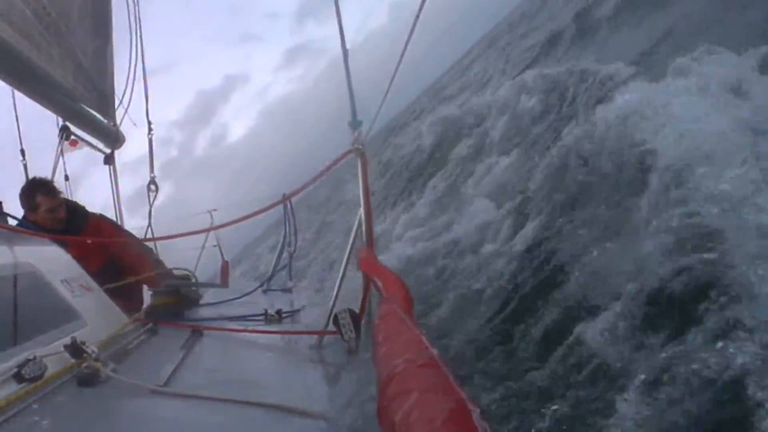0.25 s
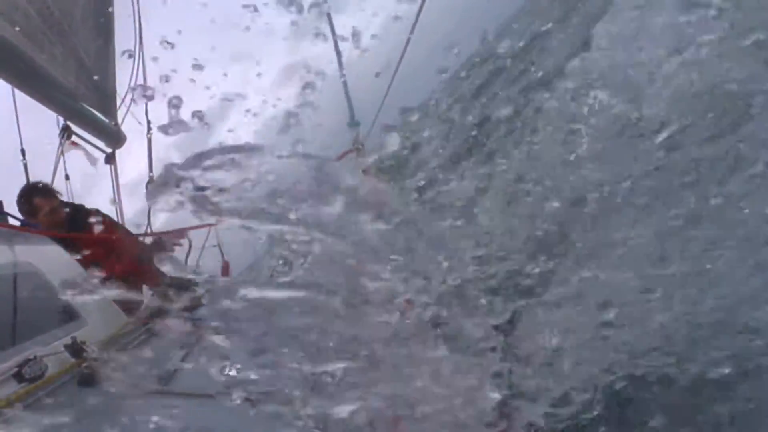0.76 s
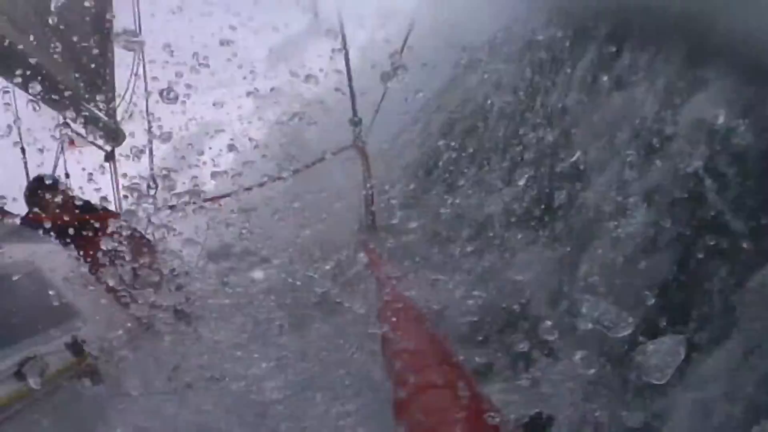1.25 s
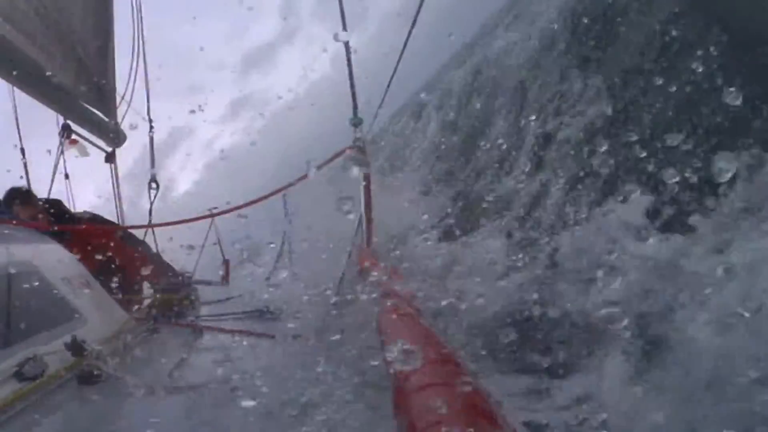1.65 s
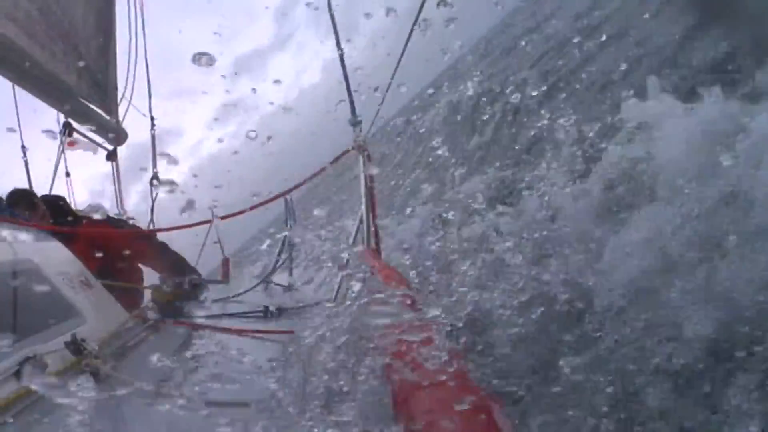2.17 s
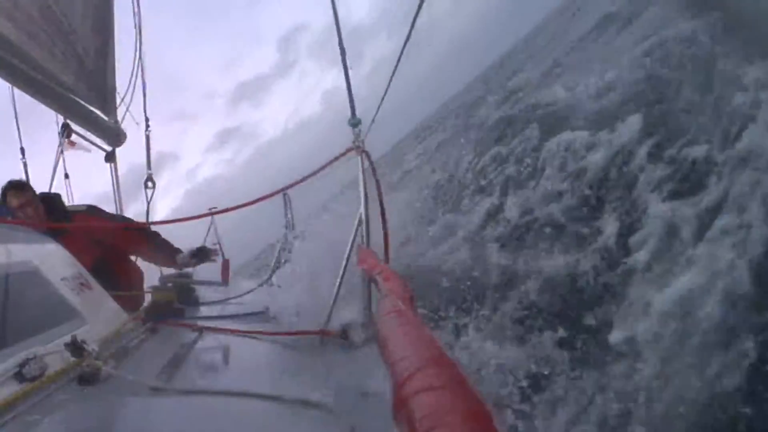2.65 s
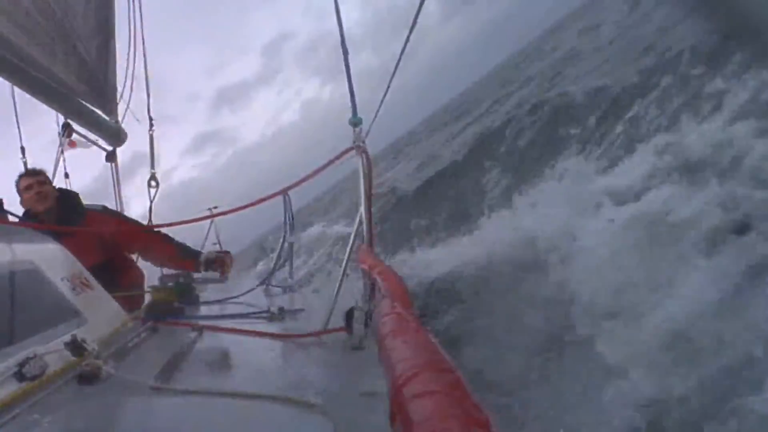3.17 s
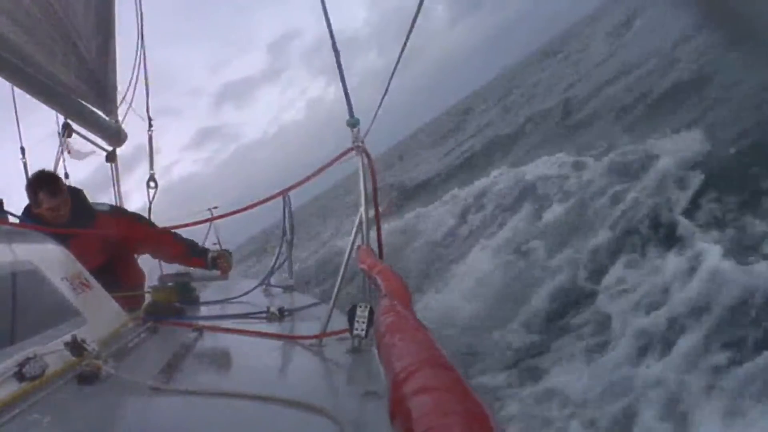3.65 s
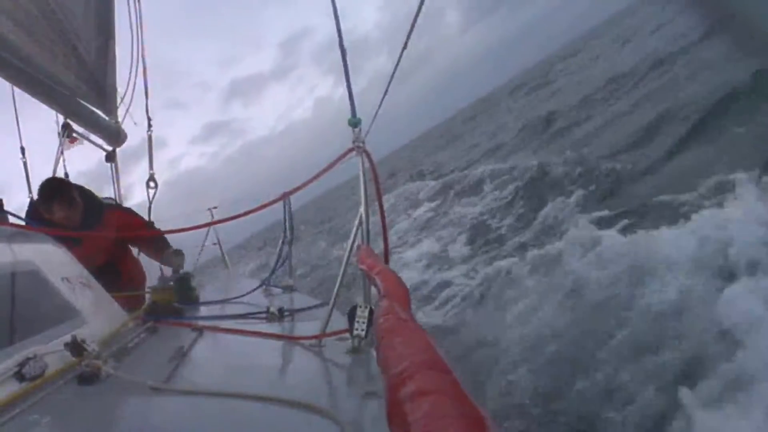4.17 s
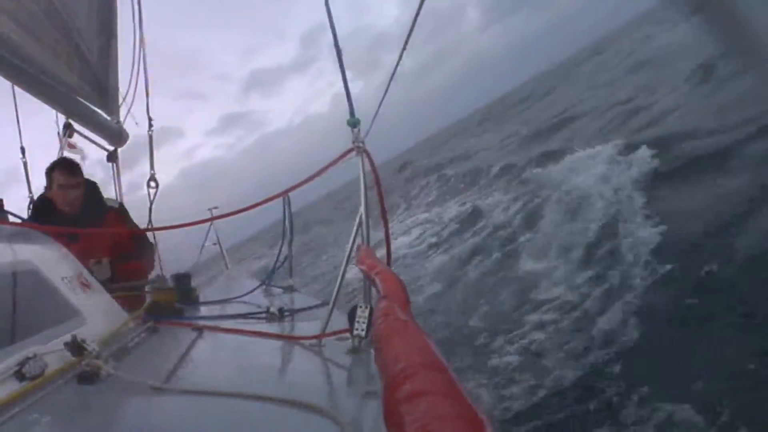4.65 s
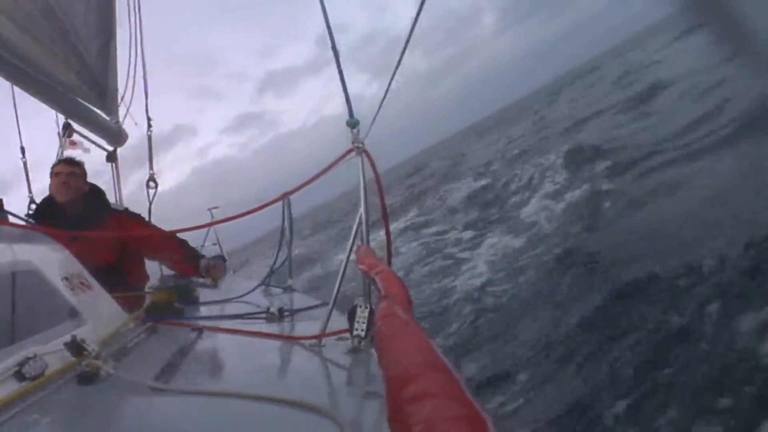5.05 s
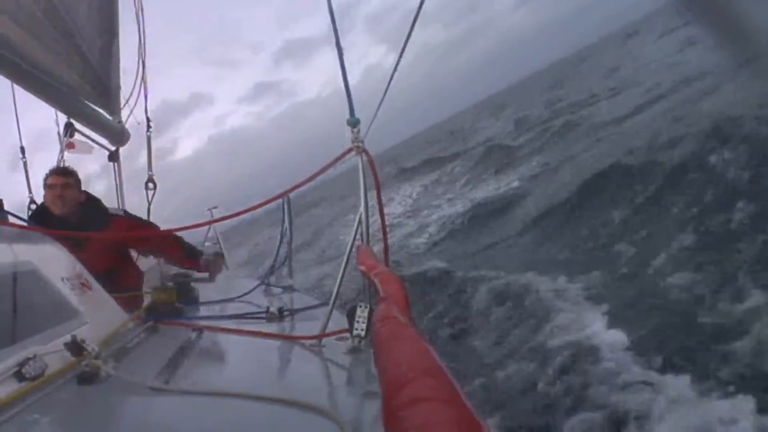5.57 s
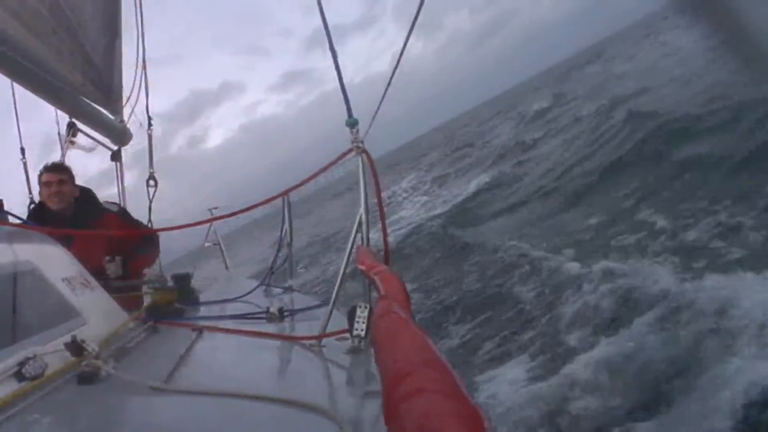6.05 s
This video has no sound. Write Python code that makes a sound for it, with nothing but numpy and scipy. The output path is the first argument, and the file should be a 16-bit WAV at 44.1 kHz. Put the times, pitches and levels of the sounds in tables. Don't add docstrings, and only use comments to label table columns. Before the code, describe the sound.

The microphone sits in a sealed plastic case on a yacht's rail, so everything is close, hollow and dull on top. At 0 s a wave is already breaking: dense rough scrubbing, rapid plasticky jolts and a loud groan falling in pitch, easing by 0.5 s. Low water thuds at 0.8-0.95 s lead into a surge around 1 s with a wavering groan; a sharp tap at 1.25 s, then steady wash and faint mist hiss to 1.7 s. A clap and tiny squeak mark 2 s. Another surge peaks near 2.4 s, a hard tap at 2.7 s, then brighter spray with higher groaning and hull hum until 3.2 s. From 3.5 s water drains away; clamp knocks grow louder until 4.2 s. Near quiet follows, with faint hiss and small ticks. At 5.4 s a massive booming, cracking slam overloads the microphone; soft knocks follow, then a lighter rattling slam at 6.24 s.

```python
import sys
import numpy as np
from scipy import signal
from scipy.fft import rfft, irfft, next_fast_len
from scipy.io import wavfile
from scipy.ndimage import uniform_filter1d, map_coordinates

SR = 44100
rng = np.random.default_rng(int(sys.argv[2]) if len(sys.argv) > 2 else 0)


def undo_db(level):
    steps = np.asarray(level, float) / 20
    return 10 ** steps


def int16_out(signal):
    q = np.round(np.clip(np.atleast_2d(signal).T, -1, 1) * 32767)
    wavfile.write(sys.argv[1], SR, q.astype(np.int16))


N = 278271


def unit(x):
    return x / np.sqrt(np.mean(x ** 2) + 1e-20)


def curves(rows):
    s, *cols = np.transpose(rows)
    return [np.interp(np.arange(N) / SR, s, c) for c in cols]


def wobble(rate_hz):
    knots = rng.standard_normal(int(N * rate_hz / SR) + 4)
    return map_coordinates(knots, [np.arange(N) * rate_hz / SR])


def filtered(x, response):
    m = next_fast_len(x.shape[-1] + SR // 4)
    spectrum = rfft(x, m) * response(np.fft.rfftfreq(m, 1 / SR))
    return irfft(spectrum, m)[..., :x.shape[-1]]


def ringing(x, modes):
    def response(f):
        return sum((-1) ** k * undo_db(db) * 1j * f * width / (hz * hz - f * f + 1j * f * width)
                   for k, (hz, width, db) in enumerate(modes))
    return filtered(x, response)


def coloured(spectrum):
    hz, db = np.transpose(spectrum)
    noise = rng.standard_normal(N)
    return unit(filtered(noise, lambda f: undo_db(np.interp(np.log(f + 1), np.log(hz + 1), db))))


def swells(rows, rest_db, rise_s, fall_s):
    s, db = np.transpose(rows)
    grid = np.arange(0, N, 64)
    late = grid[:, None] / SR - s
    swell = undo_db(2 * db) * np.exp(-np.maximum(-2 * late / rise_s, 2 * late / fall_s))
    power = undo_db(2 * rest_db) + swell.sum(axis=1)
    return np.interp(np.arange(N), grid, np.sqrt(power))


def damped(x):
    return filtered(x, lambda f: 1 / (1 + 1j * f / 2600) ** 2)


def evened(x):
    x = unit(x)
    return x / (np.abs(uniform_filter1d(x ** 2, size=300)) + 0.061) ** (0.3 / 2)


def displaced(wash, lumps):
    fine, solid = np.abs(uniform_filter1d(np.array([wash, lumps]) ** 2, size=200))
    return wash * np.sqrt(fine / (fine + 2 * solid + 1e-20))


# frequency in Hz, width in Hz, level in dB.
RAIL_MODES = [(185, 40, -4), (251.4, 49.5, -3), (313.8, 15.8, 0), (441.5, 34, -9.5)]
CLAMP_MODES = [(562, 70, 0), (632, 41, 5.5), (722, 31, 4.5), (797, 32, -2), (948, 53, 4.5), (957, 367, -10)]
CASE_MODES = [(1384.6, 40.4, 2.5), (1477.5, 66.4, 5.5), (1534, 42, 6.5), (1639, 104, -3.5)]
DOOR_MODES = [(1730, 120, -6), (1833, 88, 4.5), (2070, 85, -4), (1966, 74, -10.5)]
COVER_MODES = [(2410, 480, -1.5), (2980, 160, 5.5), (3177, 120, 4), (3490, 60, 4.5), (3924, 80, 8),
               (4520, 220, -8.5), (4800, 550, -33.5), (4840, 86, -6), (4700, 63, -19)]
# start in seconds, force in dB, spray height in dB, load on the clamp in dB.
WASH = [
    [(0, -24.5, -3, 0), (.04, -19, -16, -10), (.425, -21.5, -22, -4), (.46, -40, -28.5, 17.5),
     (.56, -43.5, -7.5, 15)],
    [(.66, -32.5, -14, 0), (.74, -30, -15.5, 1), (.88, -19, -17, -6), (.97, -19, -18, -6.5),
     (1.08, -20.5, -19.5, -5.5), (1.14, -32.5, -20.5, 8.5), (1.2, -24.5, -23, -3.5),
     (1.25, -36.5, -10.5, -1)],
    [(1.3, -27.5, -18, -4.5), (1.42, -21.5, -18, -8.5), (1.51, -20, -17, -16), (1.6, -21.5, -18.5, -13),
     (1.68, -27, -18, -2.5), (1.82, -37.5, -1.5, 7)],
    [(2.02, -30.5, -7, 3.5), (2.25, -22.5, -24, -6), (2.33, -20, -27, -10), (2.43, -20.5, -15.5, -7.5),
     (2.47, -29.5, 0.5, 2)],
    [(2.68, -30.5, 6, 2), (2.76, -22.5, 0.5, -4.5), (2.89, -25, -1.5, 0), (2.93, -34, 8.5, 3),
     (3.01, -21.5, -5.5, -4), (3.05, -34, 7, 8.5), (3.24, -35, -4.5, 0), (3.3, -36, -4.5, -2.5),
     (3.42, -38, -5, 14), (3.5, -47.5, 6, -14)],
]
# level in dB at full force, then dB per dB of force, of spray height, of load.
ANSWER = [
    (-33.5, 0.54, 0.0065, 0.068),
    (-20, 1.86, 0.015, 0.97),
    (-20.5, 1.34, 0.007, 0.0092),
    (-18.5, 1.71, 1.06, 0.01),
    (-31, 1.96, 0.38, 0.34),
]


def scrub():
    clumps = undo_db(1.0 * wobble(70) + 0.6 * wobble(18))
    impacts = rng.standard_normal(N) * undo_db(1.9 * rng.exponential(size=N))
    force_db, height_db, load_db = curves(sum(WASH, []))
    full_db, ebb_db_per_s = -20, 2.5
    ebb_s = np.maximum(np.arange(N) / SR - WASH[-1][-1][0], 0)
    force_db = force_db - ebb_db_per_s * ebb_s - full_db
    sound = 0
    parts = [RAIL_MODES, CLAMP_MODES, CASE_MODES, DOOR_MODES, COVER_MODES]
    for modes, (db, by_force, by_height, by_load) in zip(parts, ANSWER):
        own = undo_db(1.2 * wobble(29.626)) * (impacts + 0.76 * rng.standard_normal(N))
        if modes is COVER_MODES:
            patchy = undo_db(0.33 * wobble(21))
            ring = ringing(clumps * own * patchy, modes)
            felt_db = uniform_filter1d(force_db, size=SR // 10)
        else:
            ring = damped(evened(ringing(clumps * own, modes)))
            felt_db = force_db
        level_db = db + by_force * felt_db + by_height * height_db + by_load * load_db
        sound = sound + undo_db(level_db) * unit(ring)
    return sound


# time in seconds, slips per second in Hz, level in dB.
GROANS = [
    [(0.0, 282.4, -17), (0.04, 260.6, -28.5), (0.104, 258.8, -32.5), (.14, 264.9, -31), (0.174, 254.4, -28),
     (.215, 236.3, -29.5), (0.25, 192, -32.5), (0.32, 182.1, -23.5), (.36, 182.4, -30.5), (0.5, 174, -35)],
    [(0.8, 164.6, -35.5), (0.858, 184, -23.5), (0.93, 239, -52), (1.018, 247, -38), (1.074, 163.6, -24.5),
     (1.12, 150.7, -30.5)],
    [(1.38, 186.8, -38), (1.49, 221.8, -27.5), (1.544, 194, -51.5), (1.602, 176.4, -27),
     (1.66, 176.6, -28.5)],
    [(2.3, 165.9, -25.5), (2.358, 182.6, -39.5), (2.428, 202.4, -31), (2.5, 218, -67)],
    [(2.48, 316.4, -41), (2.56, 310, -39), (2.66, 315.4, -44), (2.7, 329.4, -32.5), (2.788, 369, -35.5),
     (2.936, 397, -37), (2.99, 363.6, -34.5), (3.12, 377.3, -37.5), (3.15, 378, -48.5)],
]
GROAN_DRIVE_DB = [-6, -0.5, -4, -4]
# frequency in Hz, width in Hz.
SINGING = [(750, 26), (940, 15)]


def groans():
    def overtone_gain(f):
        lift = sum(1 / (1 + ((f - mode_hz) / width_hz) ** 2) for mode_hz, width_hz in SINGING)
        return undo_db(-17 + 20.5 * lift)

    t, tugs, swing = np.arange(N) / SR, np.zeros(N), np.zeros(N)
    for rows in GROANS:
        hz, db = curves(rows)
        turns = np.cumsum(hz * (1 + 0.017 * wobble(60))) / SR
        start_s, end_s = rows[0][0], rows[-1][0]
        fade = np.clip(np.minimum(t - start_s + .015, end_s - t) / 0.025, 0, 1)
        slips = np.diff(np.floor(turns), prepend=0)
        tugs += slips * fade * undo_db(db + 32.5 + 1.4 * wobble(44))
        overtones = sum(overtone_gain(k * hz) * np.sin(k * 2 * np.pi * turns) for k in range(2, 6))
        swing += (np.sin(2 * np.pi * turns) + overtones) * fade * undo_db(db - 1.5 + 1.2 * wobble(25))
    pull = damped(tugs)
    parts = [RAIL_MODES, CLAMP_MODES, CASE_MODES, DOOR_MODES]
    return swing + sum(undo_db(db) * ringing(pull, modes) for db, modes in zip(GROAN_DRIVE_DB, parts))


# time in seconds, peak in dB, ring in Hz.
CASE_JOLTS = [(0.001, -15.5, 1530), (0.033, -13.5, 1460), (0.062, -9.5, 1564), (0.1386, -10.5, 1485),
              (0.1678, -13.5, 1480), (0.2514, -10.5, 1478), (0.3174, -13, 1520), (0.3892, -16, 1600),
              (0.4928, -25, 1515), (0.666, -29.6, 1480), (0.678, -25, 1474), (0.7356, -21.5, 1470),
              (0.8733, -15, 1432), (0.889, -13.5, 1500), (0.9728, -8, 1490), (0.9911, -12, 1480),
              (1.046, -16.5, 1520), (1.068, -16, 1450), (1.084, -16, 1440), (1.1814, -29, 1515),
              (1.2018, -25, 1490), (1.285, -17.5, 1454), (1.2967, -20.5, 1490), (1.4532, -14.5, 1565),
              (1.487, -13, 1490), (1.5347, -10, 1520), (1.594, -13.5, 1470), (1.6154, -13.5, 1467),
              (1.891, -28, 1420), (1.9077, -31, 1440), (1.9567, -25, 1460), (2.081, -20, 1430),
              (2.0988, -20, 1605), (2.1837, -17, 1510), (2.2435, -13.5, 1446), (2.3178, -11, 1505),
              (2.339, -12.5, 1440), (2.4254, -13.5, 1460), (2.525, -23, 1470), (2.597, -19.5, 1560),
              (2.7066, -23, 1534), (2.728, -18, 1570), (2.8067, -26.5, 1560), (2.8873, -16.5, 1430),
              (2.98, -17, 1540), (3.0058, -16.5, 1500), (3.129, -26, 1470), (3.1534, -31.5, 1460),
              (3.249, -27.5, 1450)]
CLAMP_JOLTS = [(0.0519, -18, 777), (0.0841, -17.5, 782), (0.1893, -19.5, 775), (0.3769, -25, 788),
               (0.4259, -29, 810), (0.6564, -34, 725), (0.9957, -20, 800), (1.1983, -27, 743),
               (1.2637, -37, 760), (1.9046, -44, 784), (2.0743, -26, 677), (2.1626, -24.5, 710),
               (2.2487, -26.5, 700), (2.4059, -27, 690), (2.4474, -24, 760), (2.5124, -27, 930),
               (2.645, -21.5, 943), (2.7917, -16.5, 734), (2.8702, -18, 738), (2.8903, -20.5, 742),
               (2.9885, -20, 717), (3.0155, -23.5, 724)]
DOOR_JOLTS = [(0.027, -28, 1890), (0.1715, -26.5, 1890), (0.4, -30, 1750), (0.865, -32.5, 1883),
              (0.9597, -28.5, 1914), (1.068, -34.5, 1930), (1.2538, -38, 1920), (1.3312, -28, 1860),
              (1.477, -23.5, 1850), (1.6415, -33, 1900), (1.659, -27.5, 1850), (1.848, -37, 1790),
              (1.99, -25.5, 1830), (2.2347, -24.5, 1850), (2.27, -26, 1840), (2.3008, -24.5, 1850),
              (2.3685, -29, 1790), (2.3907, -30, 1820), (2.477, -26, 1840), (2.5996, -20, 1830),
              (2.7599, -17, 1960), (2.7904, -16, 1810), (2.859, -16.5, 1900), (2.9879, -19, 1872),
              (3.0067, -18, 1866), (3.1234, -25, 1820), (3.2452, -41, 1860)]
LATE_JOLTS = [(3.8291, -29, 1480), (3.8792, -34, 1470), (3.9362, -36, 1450), (4.1712, -35, 1470),
              (4.2062, -28, 1480), (4.2172, -31, 1470), (4.6512, -32, 1450), (4.6522, -40, 1880),
              (4.6602, -30, 1480), (4.7582, -44, 1450), (4.7722, -43, 1480), (4.9242, -35, 1450),
              (5.9072, -37, 1480), (6.2445, -14, 1560), (6.2432, -20, 2050), (6.249, -25, 2200),
              (5.437, -30, 1450), (6.2535, -17, 1480)]
RAIL_JOLTS = [(0.59, -44, 227), (0.845, -24, 193), (0.914, -24.5, 229), (0.97, -24, 298),
              (1.083, -25.5, 233), (1.2018, -34, 252), (1.257, -30, 290), (1.293, -31.5, 205),
              (1.5943, -25, 180), (1.7235, -44, 234), (1.7883, -43.5, 284), (1.9094, -34, 258.5),
              (1.9395, -36.5, 235), (1.999, -35, 277), (2.118, -44, 225), (2.1611, -33.5, 269),
              (2.314, -27.5, 275), (2.3707, -24, 206), (2.4429, -27, 284), (2.684, -46.5, 265),
              (3.0651, -24.5, 226.5), (4.38, -41.5, 240), (4.6668, -44, 235), (4.841, -42, 207),
              (4.9481, -45.5, 240), (5.036, -45.5, 214), (5.111, -47, 203), (5.1763, -40, 225),
              (5.5832, -38, 248), (5.663, -42, 232), (5.9353, -29.5, 214)]
COVER_JOLTS = [(0.1309, -33, 2520), (0.263, -39, 2760), (0.866, -35, 3150), (0.9622, -33.5, 3060),
               (0.987, -35.5, 3154), (1.2532, -41, 2730), (1.2804, -43, 3060), (1.3221, -44.5, 2970),
               (1.4932, -44, 3230), (1.6338, -49.5, 3000), (1.8464, -51, 2983), (2.256, -41, 3146),
               (2.391, -35, 3200), (2.5164, -32, 3950), (2.9511, -43, 3054), (3.1887, -52, 3560),
               (3.23, -41, 3055), (3.3745, -54, 2900)]
SOFT_JOLTS = [(3.1185, -26.5, 600), (3.318, -33.5, 515), (3.3485, -38, 725), (4.3512, -43, 705),
              (4.7712, -48, 780), (4.9248, -43.5, 540), (5.1362, -42, 740), (5.2761, -47, 724),
              (5.6703, -40, 550), (5.9311, -59, 586), (6.0377, -58, 667), (6.2479, -21, 922)]
# rise in seconds, fall in seconds.
JOLT_S = [
    (0.0036, 0.0042),
    (0.0061, 0.011),
    (0.0014, 0.0074),
    (0.0013, 0.0042),
    (0.014, 0.015),
    (0.002, 0.0034),
    (0.0054, 0.0074),
]


def jolts():
    before = 1024
    sound, t = np.zeros(N + SR), np.arange(-before, 3072) / SR
    kinds = [CASE_JOLTS, CLAMP_JOLTS, DOOR_JOLTS, LATE_JOLTS, RAIL_JOLTS, COVER_JOLTS, SOFT_JOLTS]
    for rows, (rise_s, fall_s) in zip(kinds, JOLT_S):
        shape = np.exp(-(t / np.where(t < 0, rise_s, fall_s)) ** 2)
        for s, db, hz in rows:
            jitter = uniform_filter1d(rng.standard_normal(len(t)), size=90)
            drift = np.cumsum(jitter) * hz ** 2 / 7e7
            sound[round(s * SR):][:len(t)] += undo_db(db) * shape * np.cos(2 * np.pi * hz * t + drift)
    return sound[before:N + before]


# time in seconds, level in dB.
FLEX = [(.33, -53), (.51, -41), (.94, -37), (1.26, -29), (1.39, -33), (1.66, -35), (2.08, -32),
        (2.4, -40.5), (2.65, -40), (2.86, -24), (3.04, -22.5), (3.2, -29), (3.33, -30.5), (3.496, -32.5),
        (3.654, -38.5), (3.9, -33), (4.1, -35.5), (4.196, -33), (4.366, -37), (4.44, -41), (4.6, -48),
        (5.166, -38), (5.52, -33), (5.704, -34), (5.92, -40), (5.966, -34), (6.18, -46)]
# frequency in Hz, width in Hz, level in dB.
HULL_MODES = [(131.5, 11.9, 6.5), (100, 18, -30)]


def hull():
    hum = ringing(rng.standard_normal(N), HULL_MODES)
    hum = unit(ringing(hum, [(125, 1400, 0)]))
    return swells(FLEX, rest_db=-51, rise_s=0.053, fall_s=0.042) * hum


# time in seconds, level in dB.
HEAVE = [(.12, -49), (.49, -48), (.84, -45), (1.29, -28), (1.38, -30), (1.47, -35.5), (1.8, -40),
         (2.07, -28), (2.15, -36.5), (2.23, -37), (2.45, -38.5), (2.7, -38.5), (3.0, -46), (3.3, -41.5),
         (3.55, -40), (4.9, -64), (5.3, -61)]
# frequency in Hz, level in dB per Hz.
SWING = [(5, -26), (10, -12.5), (20, -13), (29, 2.5), (40, -13), (55, -15.5), (80, -47), (150, -120)]
HISS = [(35, -72.5), (60, -9.5), (206, -6.5), (371, -28.5), (400, -25.5), (521, -14), (618, -24.5),
        (733, -10.5), (838, -21.5), (1480, -10.5), (2470, -24.5), (3500, -37), (5580, -32), (7250, -68.5),
        (12300, -120)]
# time in seconds, level in dB.
FAR_CREST = [
    (4.35, -48),
]
# frequency in Hz, width in Hz, level in dB.
AIR_GAP = [(2870, 100, 1.5), (3990, 310, 2)]


def background():
    heave = swells(HEAVE, rest_db=-49, rise_s=0.041, fall_s=0.089) * coloured(SWING)
    gap = unit(ringing(rng.standard_normal(N), AIR_GAP))
    far = coloured(HISS) + undo_db(-12 + 2.0 * wobble(27)) * gap
    return heave + swells(FAR_CREST, rest_db=-52.5, rise_s=0.39, fall_s=0.29) * far


# time in seconds, peak in dB, weight passed on to hull, rail and clamp in dB.
TAPS = [
    (0.4928, -39, 20.5),
    (1.2516, -22.5, 8),
    (2.695, -19, 6),
    (3.9473, -30.5, 13),
    (4.4643, -49, 2),
    (4.6477, -46.5, 17),
    (4.9195, -41, 6.5),
    (5.6521, -39, 10),
    (5.6666, -32, 0),
]
SLIPS = [(0.724, -26, -5.5), (3.4815, -31, 4.5), (3.6309, -26.5, 2), (3.765, -30, 5.5), (3.817, -24.5, 2),
         (3.887, -22, -1), (3.985, -20.5, 1), (4.0729, -18, -1), (4.1852, -16, 1), (4.348, -48, 9),
         (4.755, -53.5, 8)]
THUDS = [(2.859, -23.5, -17), (2.95, -23, -5), (3.0357, -42.5, 17.5), (3.307, -38, 0.5),
         (3.3225, -41, -0.5), (3.385, -40, 6), (3.4093, -42, 10.5), (3.397, -41, 2.5), (3.426, -43.5, 5),
         (5.1326, -54, 14), (5.903, -41.5, 5), (5.9369, -48, 1), (6.0332, -49, 1.5)]
DROPS = [(1.847, -43, -1), (1.969, -49, -4), (1.985, -32, 0), (3.1453, -37, 3.5), (3.1861, -41, 10),
         (3.2184, -38.5, -5), (3.226, -38.5, -16), (3.244, -39, -21), (3.344, -43, 9), (4.49, -43, -20),
         (5.165, -51.5, 7), (5.287, -52, -3), (5.3707, -36.5, -6.5)]
# hull, rail, clamp, lens cover, case, door in dB against the peak.
REACH = [
    (-21.5, -21, -13, -36, -7, -3.5),
    (-13, -4, 1, -25.5, -3, -14),
    (0, -2.5, -1.5, -26, -0.5, -9.5),
    (-15.5, 2, -7, -1, -7, -6.5),
]
# frequency in Hz, t60 in seconds, level in dB.
STRUCK = [
    [(128.3, 0.16, 0)],
    [(192, 0.11, -3.5), (260, 0.055, 7.5), (295.6, 0.12, -1.5)],
    [(540, 0.017, -11), (420, 0.055, -9.5), (664, 0.13, -5.5), (725, 0.034, 10.5), (810, 0.0047, -7.5),
     (938, 0.079, -4)],
    [(2350, 0.021, -4), (2870, 0.01, 2.5), (3570, 0.0057, 3.5), (3950, 0.021, -3), (4330, 0.011, -2),
     (5140, 0.0037, 0)],
    [(1450, 0.039, 4.5), (1560, 0.022, 0.5)],
    [(1860, 0.03, -1.5), (2060, 0.017, -3)],
]


def knocks():
    kinds, t = [TAPS, SLIPS, THUDS, DROPS], np.arange(SR // 5) / SR
    rows = np.concatenate(kinds)
    reach_db = np.repeat(REACH, [len(kind) for kind in kinds], axis=0)
    peak_db = rows[:, 1:2] + rows[:, 2:] * [1, 1, 1, 0, 0, 0] + reach_db
    bounce = np.round(SR * (0.0021 + 0.0066 * rng.random(len(rows)))).astype(int)
    sound = np.zeros(N + SR)
    for part, modes in enumerate(STRUCK):
        is_hull, is_cover = part == 0, part == 3
        luck_db = 2.4 * rng.standard_normal((len(rows), len(modes)))
        contact_s = .0006 if is_cover else .0014
        onset = (1 - np.exp(-t / contact_s)) ** 2
        ring = 0
        for k, (hz, t60, db) in enumerate(modes):
            decay = undo_db(db + luck_db[:, k:k + 1] - 60 * t / t60)
            ring = ring + decay * np.sin(2 * np.pi * hz * t) * onset
        chatter = uniform_filter1d(rng.standard_normal(ring.shape), size=400 if is_hull else 160, axis=1)
        ring = ring * (1 + 3.1 * chatter)
        ring = ring if is_cover else damped(ring)
        ring = -ring / np.abs(ring).max(axis=1, keepdims=True) * undo_db(peak_db[:, part:part + 1] + 4.0)
        for s, late, wave in zip(rows[:, 0] - .0019, bounce, ring):
            start = round(s * SR)
            sound[start:][:len(t)] += wave
            sound[start + late:][:len(t)] += .15 * wave
    return sound[:N]


# time in seconds, level in dB.
SURGES = [
    (.77, -38.5),
    (.87, -37),
    (.94, -33.5),
]
# time in seconds, level in dB.
MIST = [
    (1.25, -72.5),
    (1.6, -61.5),
    (1.95, -63),
    (2.5, -66.5),
    (2.85, -66),
]
# frequency in Hz, width in Hz, level in dB.
SURGE_RING = [(76, 21, 0)]
MIST_RING = [(5246, 150, 0)]


def spray():
    mist = unit(ringing(rng.standard_normal(N), MIST_RING))
    mist = swells(MIST, rest_db=-99, rise_s=0.1, fall_s=0.16) * mist
    low = unit(ringing(ringing(rng.standard_normal(N), SURGE_RING), SURGE_RING))
    return undo_db(6.5) * mist + swells(SURGES, rest_db=-82.5, rise_s=0.013, fall_s=0.013) * low


# start in seconds, # length in seconds, from Hz, to Hz, level in dB.
CHIRPS = [
    (3.945, .03, 1950, 2500, -43),
    (3.943, .016, 3850, 3950, -48),
    (3.957, .014, 4300, 4550, -52),
    (5.46, .02, 3950, 3980, -50),
    (5.492, .018, 3950, 3900, -52),
    (1.9825, .009, 4150, 3700, -26),
    (1.994, .007, 4000, 3900, -36),
]


def squeaks():
    sound = np.zeros(N)
    for s, length_s, from_hz, to_hz, db in CHIRPS:
        u = np.arange(round(length_s * SR)) / (length_s * SR)
        turns = np.cumsum(from_hz + (to_hz - from_hz) * u ** 2) / SR
        sound[round(s * SR):][:len(u)] += undo_db(db) * np.sin(np.pi * u) * np.sin(2 * np.pi * turns)
    return sound


# time in seconds, level in dB.
CRACKS = [
    (1.9845, -34),
    (1.9976, -44),
    (5.4129, -18.5),
    (5.4154, -16.5),
    (5.4196, -13),
    (5.4214, -22),
    (5.431, -33),
    (6.2482, -32),
    (6.2523, -34.5),
]
# frequency in Hz, width in Hz, level in dB.
CRACK_RING = [(2490, 400, -2), (4000, 390, 0), (4650, 600, -5)]


def cracks():
    sound, t, crack_s = np.zeros(N), np.arange(512) / SR, .0012
    for s, db in CRACKS:
        burst = rng.standard_normal(len(t)) * t * np.exp(-t / crack_s)
        clap = ringing(burst, CRACK_RING)
        sound[round((s - crack_s) * SR):][:len(t)] += undo_db(db) * clap / np.abs(clap).max()
    return sound


# time in seconds, hull, low rail, high rail and rattle in dB, rattle decay in seconds.
SLAMS = [
    (5.4093, 7, -6.5, -7, -6, 0.006),
    (6.2383, -3.5, -7.5, -2, -9, 0.0076),
]


def slams():
    sound, t = np.zeros(N + SR), np.arange(SR // 2) / SR
    loose = [(6.5, CLAMP_MODES), (5.5, CASE_MODES), (4, DOOR_MODES), (-19.5, COVER_MODES),
             (-3.5, [(950, 760, 2.0)])]
    for s, hull_db, low_db, high_db, rattle_db, rattle_s in SLAMS:
        swings = [(121.8, 0.2, hull_db - 2, 0.58), (183.4, 0.2, low_db, 1.1), (256.6, 0.11, low_db, 3.5),
                  (293.3, 0.11, high_db, 1.4), (398, 0.21, high_db - 17.0, 5.1)]
        swing = sum(undo_db(db - 60 * t / t60) * np.sin(2 * np.pi * hz * t + angle)
                    for hz, t60, db, angle in swings)
        swing = swing * (.3 + .7 / (1 + (t / .043) ** 8))
        decay = np.exp(-t / rattle_s) + undo_db(-27.5) * np.exp(-t / 0.038)
        shake = damped(rng.standard_normal(len(t)) * decay)
        rattle = sum(undo_db(db) * ringing(shake, modes) for db, modes in loose)
        rattle = undo_db(rattle_db) * rattle / np.abs(rattle).max()
        sound[round(s * SR):][:len(t)] += (1 - np.exp(-t / 0.0052)) * (swing + rattle)
    return sound[:N]


def scene():
    lumps = jolts()
    water = displaced(scrub(), lumps) + lumps + spray() + squeaks()
    boat = groans() + hull() + knocks() + cracks() + slams()
    return (water + boat + background())[None]


def top_cut(x):
    return signal.sosfilt(signal.butter(12, 15400, fs=SR, output="sos"), x)


def record(dry):
    lead = np.pad(dry, [(0, 0), (256, 0)], mode='reflect')
    shut = filtered(lead, lambda f: 1 / np.sqrt(1 + (f / 4400) ** 8) / np.sqrt(1 + (f / 5850) ** 40))
    top, hardness = .68, 40
    clipped = shut / (1 + np.abs(shut / top) ** hardness) ** (1 / hardness)
    coupling_hz, leak = 11, .55
    stored = filtered(clipped, lambda f: 1j * f / (coupling_hz + 1j * f) * np.where(f < 5700, 1, leak))
    return top_cut(stored[:, -N:] - .006)


dry = scene()
out = record(dry)
int16_out(out)
```